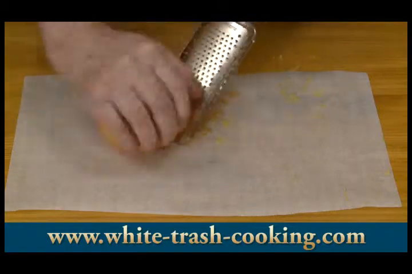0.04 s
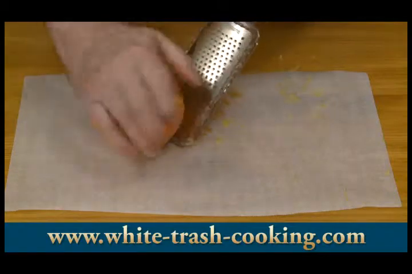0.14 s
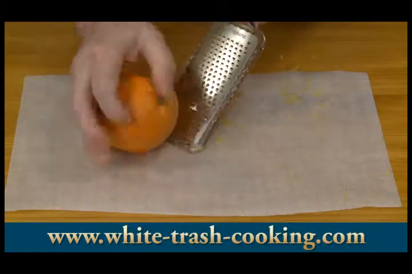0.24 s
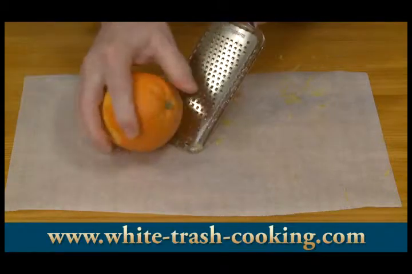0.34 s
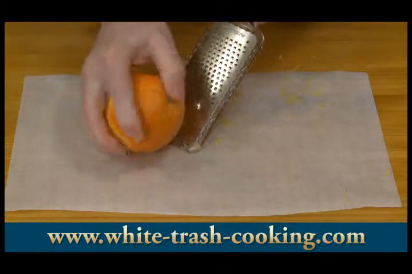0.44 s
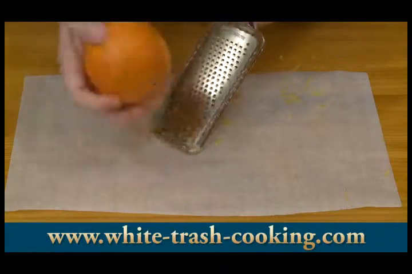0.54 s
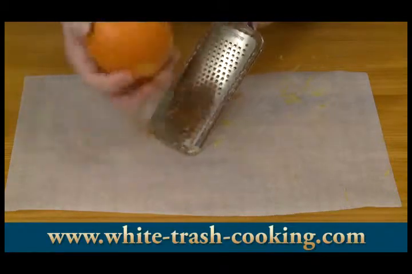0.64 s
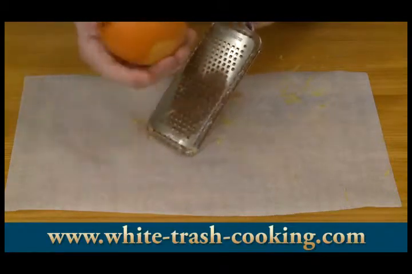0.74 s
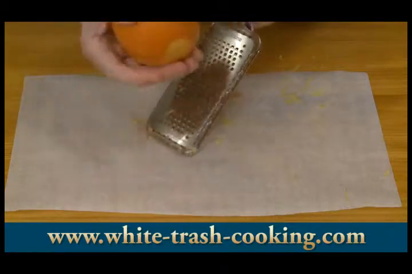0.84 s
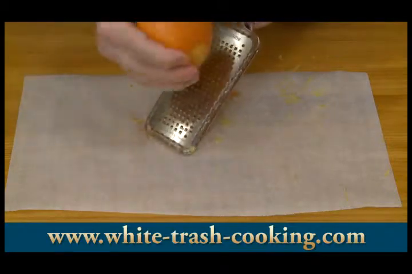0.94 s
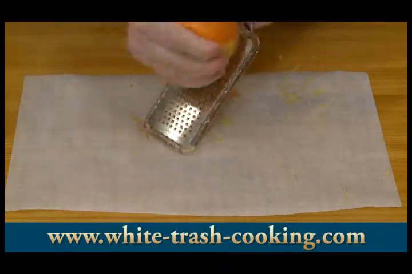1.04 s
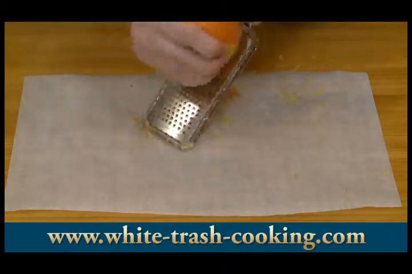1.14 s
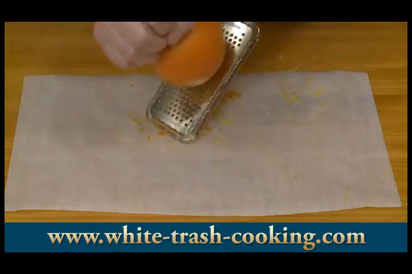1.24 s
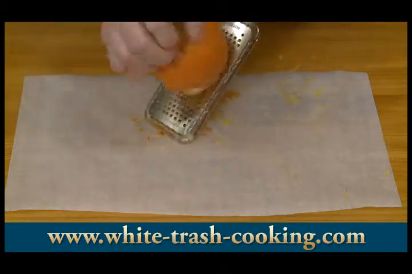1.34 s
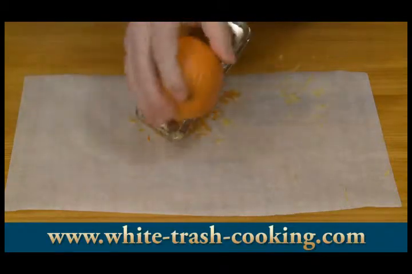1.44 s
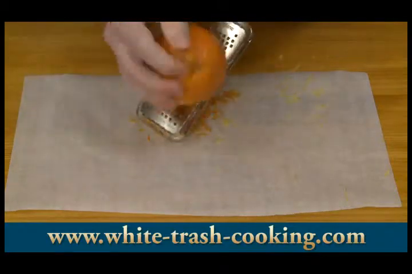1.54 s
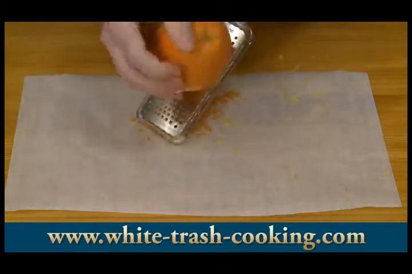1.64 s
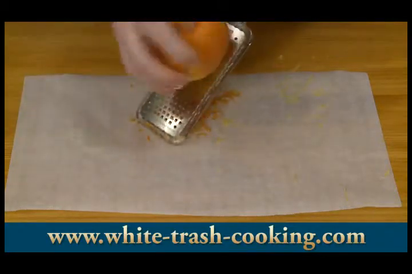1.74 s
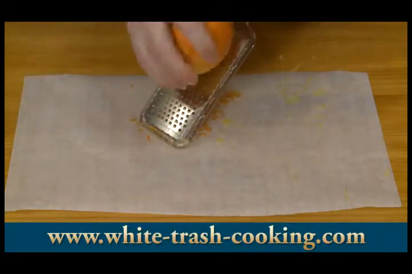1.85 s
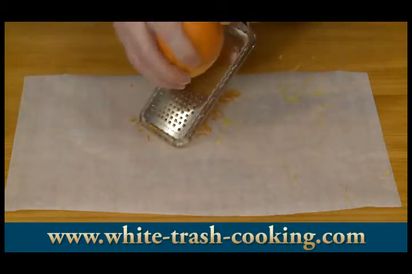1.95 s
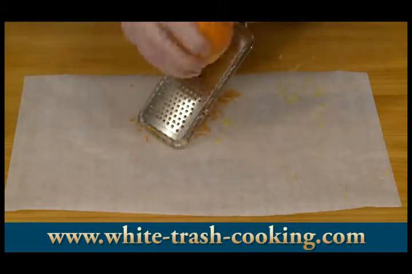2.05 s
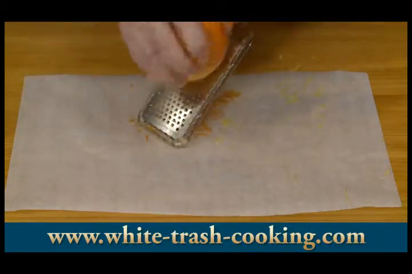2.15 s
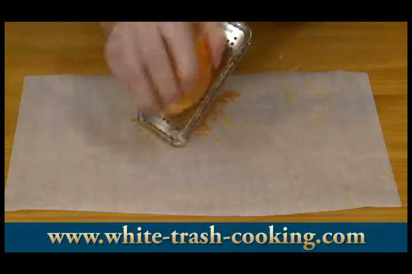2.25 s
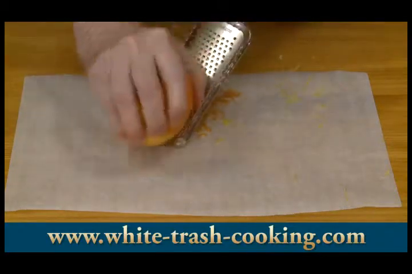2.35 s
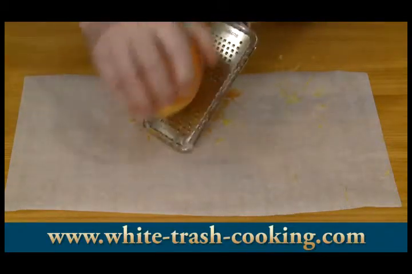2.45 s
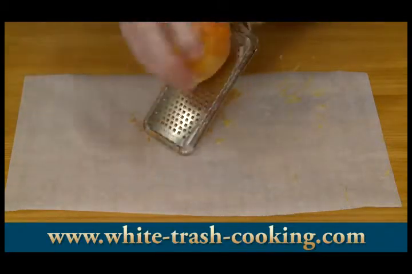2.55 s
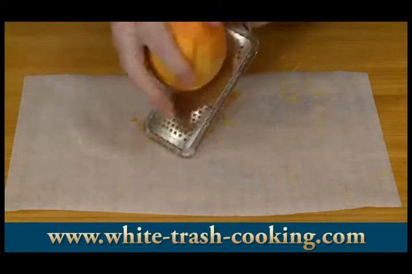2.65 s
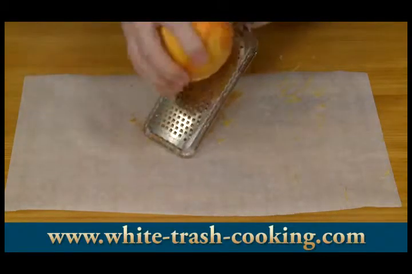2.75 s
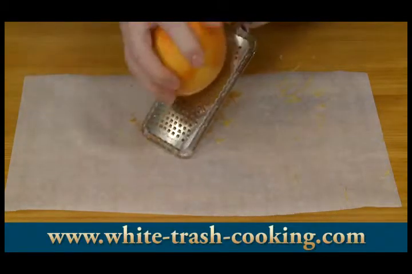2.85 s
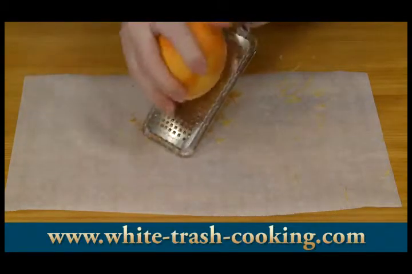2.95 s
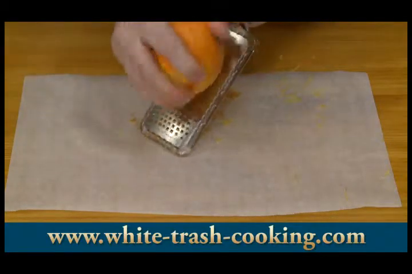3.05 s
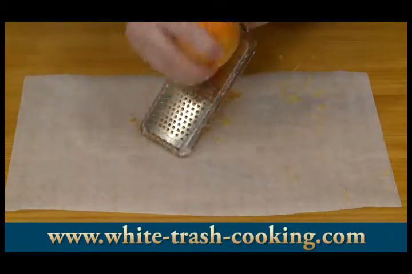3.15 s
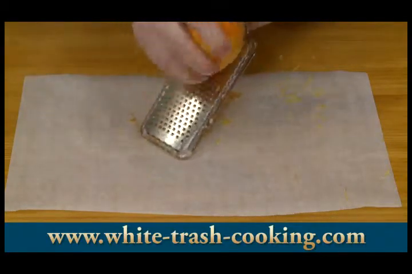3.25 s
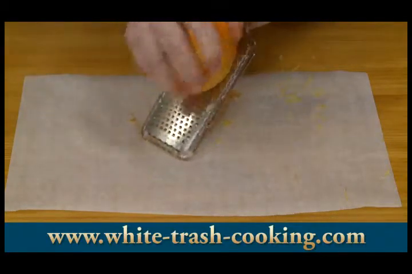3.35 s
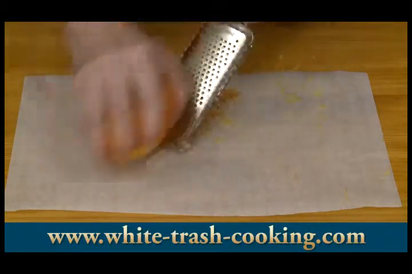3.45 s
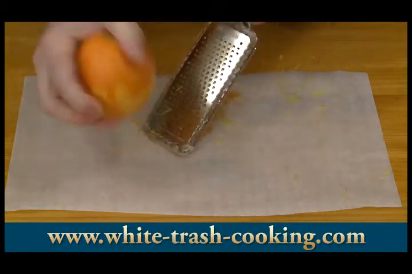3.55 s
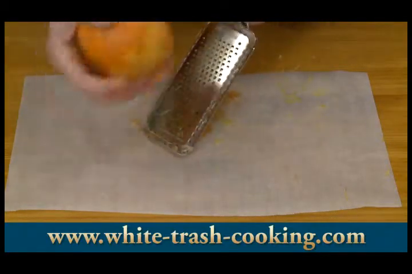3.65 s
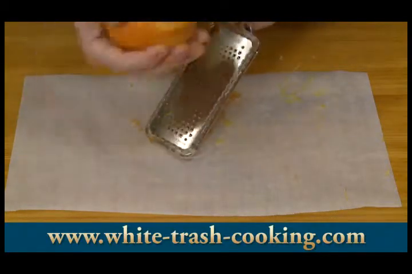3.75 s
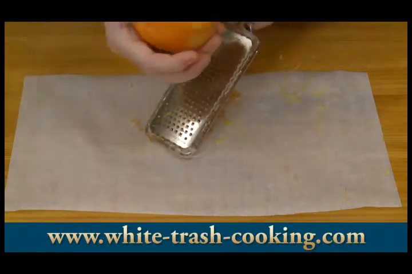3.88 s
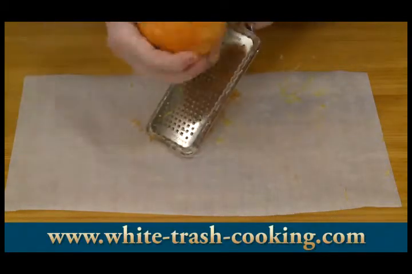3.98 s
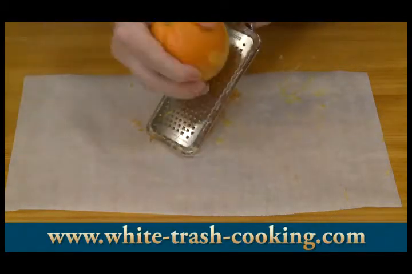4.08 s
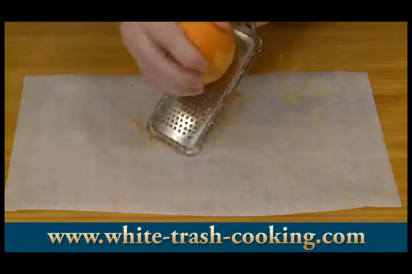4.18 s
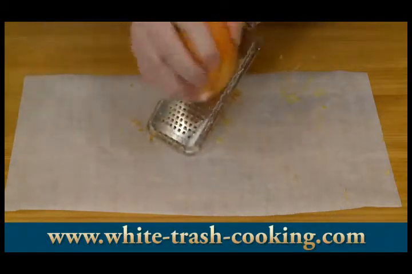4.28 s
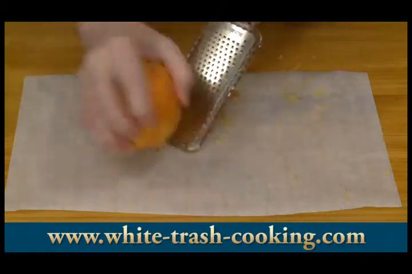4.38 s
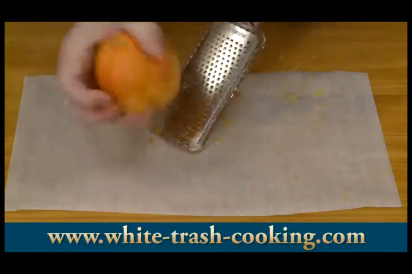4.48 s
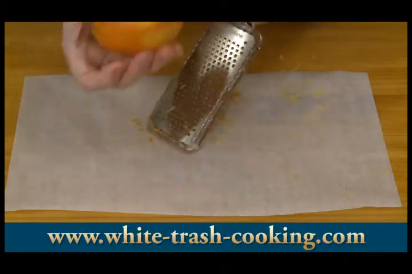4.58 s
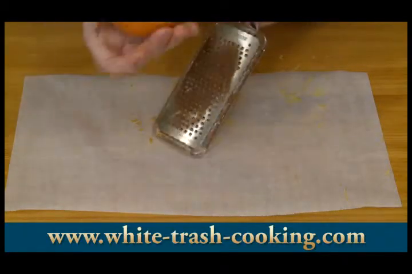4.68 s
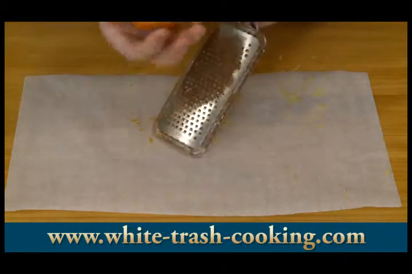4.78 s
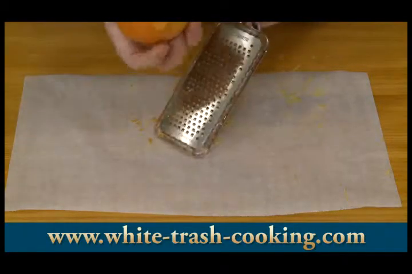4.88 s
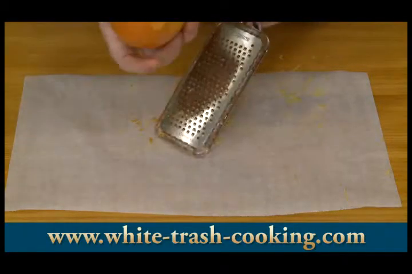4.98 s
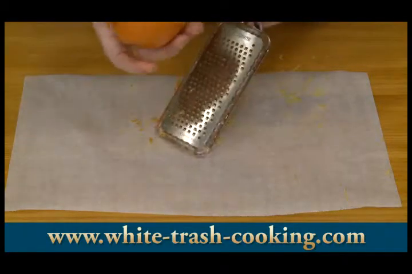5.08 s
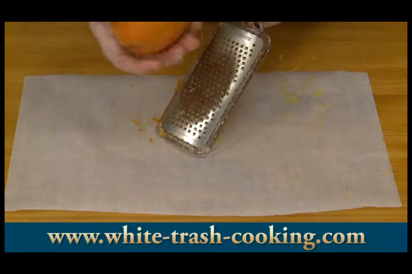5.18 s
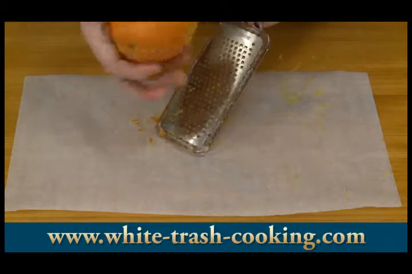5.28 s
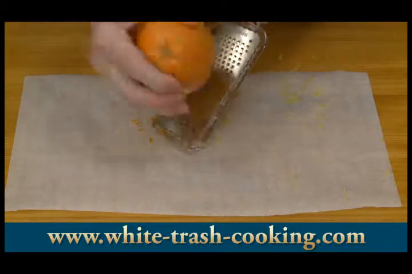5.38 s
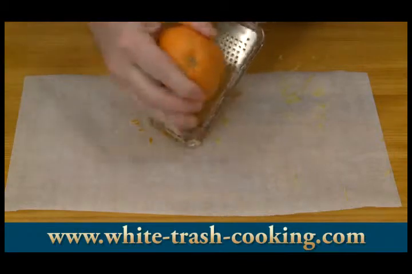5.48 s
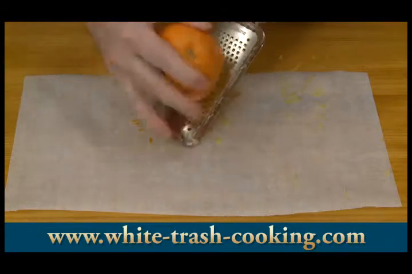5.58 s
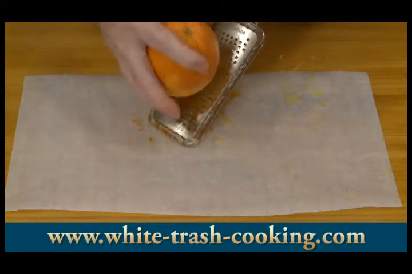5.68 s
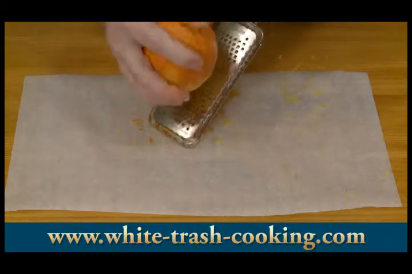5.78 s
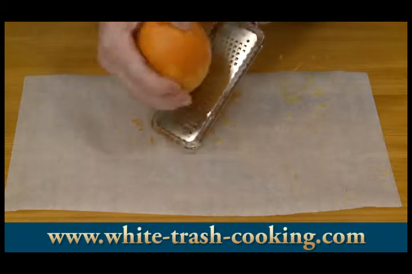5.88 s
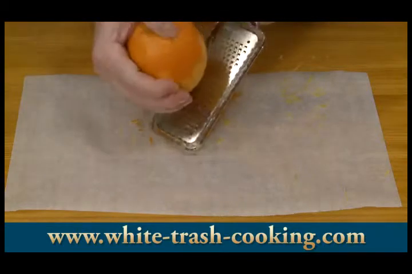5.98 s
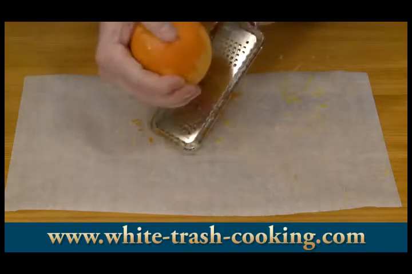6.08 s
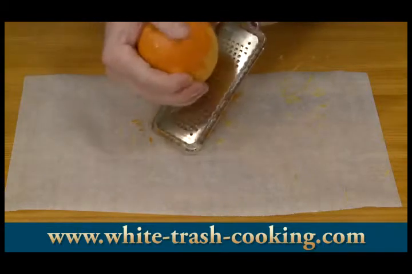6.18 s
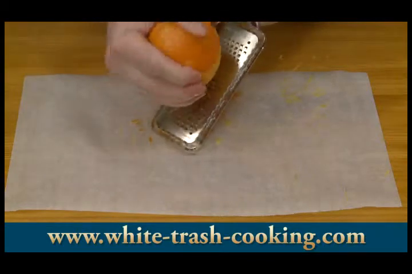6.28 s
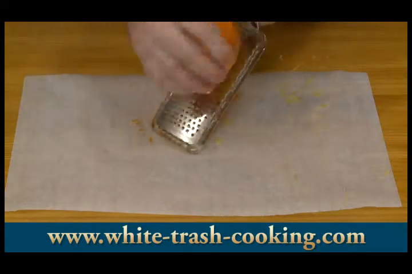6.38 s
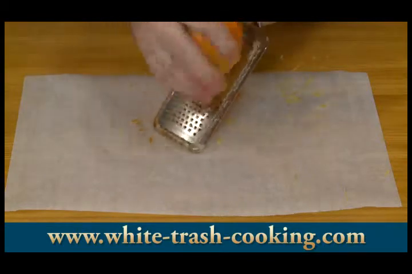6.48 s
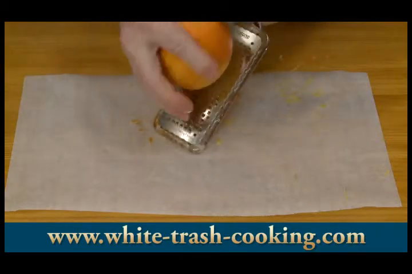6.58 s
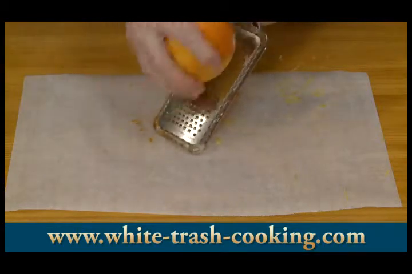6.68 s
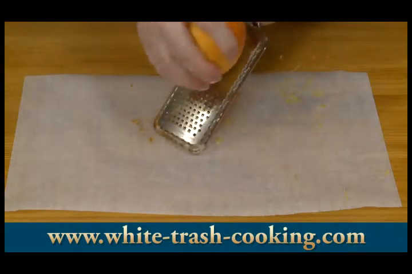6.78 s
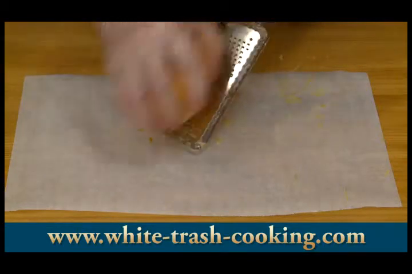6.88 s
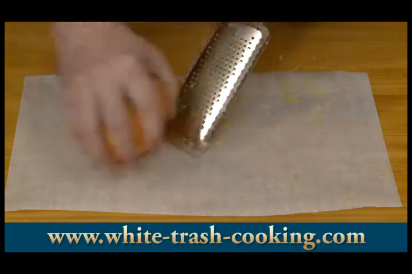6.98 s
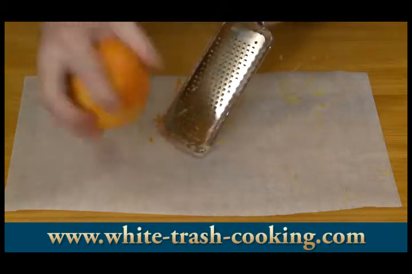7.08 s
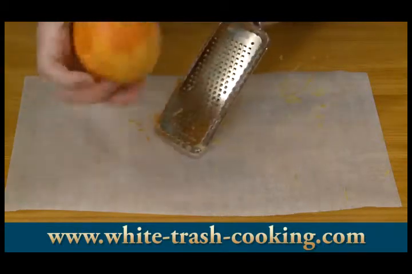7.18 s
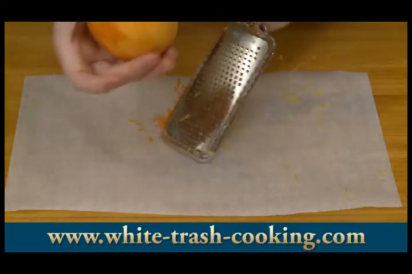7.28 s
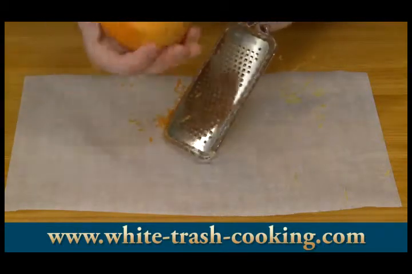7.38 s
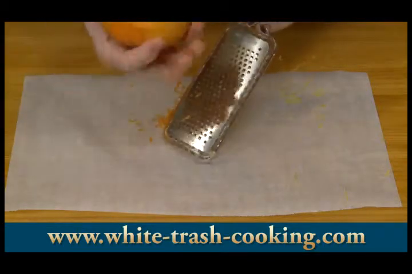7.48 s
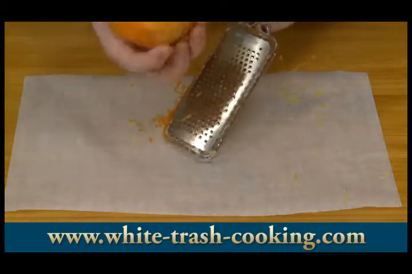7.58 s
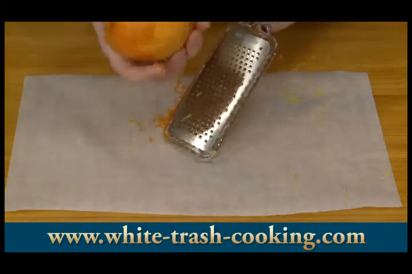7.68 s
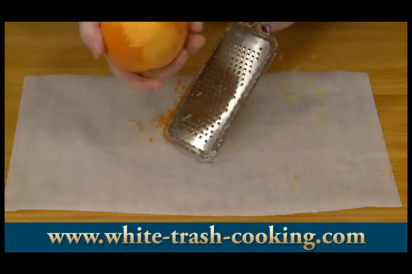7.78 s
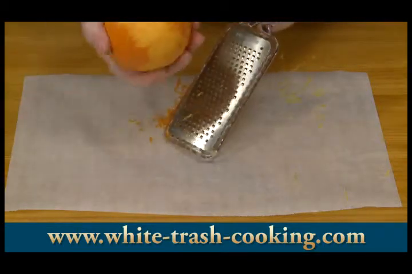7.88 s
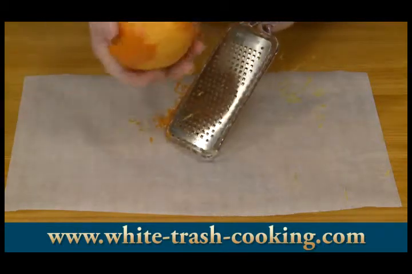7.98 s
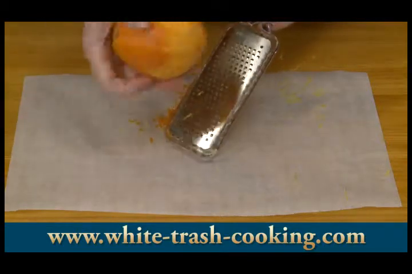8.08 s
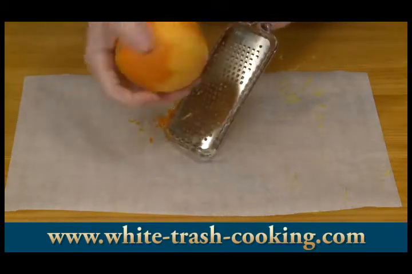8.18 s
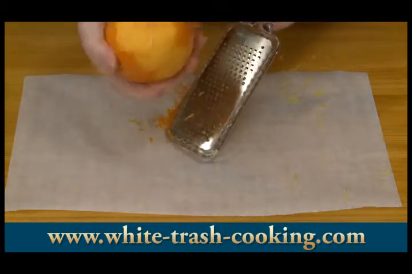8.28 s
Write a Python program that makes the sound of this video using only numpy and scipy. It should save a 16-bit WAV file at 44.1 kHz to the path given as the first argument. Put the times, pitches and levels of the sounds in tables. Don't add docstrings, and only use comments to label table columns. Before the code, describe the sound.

A quiet kitchen with a low fan rumble that wavers and a steady, thin electric buzz throughout. Close up, an orange is worked on a thin metal hand grater on a wooden table. A scrape is already ending at 0 seconds, with a soft deep thump at 0.1, then faint brushes and taps. At 1.15 a hard, dull double knock hits the plate, followed by a faint short scrape. The longest raspy pull comes at 2.2 to 2.4, with the grater's foot chattering. The strongest scrape is at 3.4, ending in a heavy low thump at 3.55. Knocks at 4.2 lead into a short swelling scrape at 4.3 to 4.4. It is mostly quiet until a loud, sharp double knock at 5.58; another single knock lands at 6.45. The last scrape at 6.9 ends in a thump and knocks around 7.05; light brushes fade, leaving only hum and buzz until 8.3.

```python
import sys
import numpy as np
from scipy import signal
from scipy.fft import irfft
from scipy.io import wavfile
from scipy.ndimage import uniform_filter1d

SR = 44100
rng = np.random.default_rng(int(sys.argv[2]) if len(sys.argv) > 2 else 0)


def boost(x):
    u = np.asarray(x, float) / 20
    return 10 ** u


def wrap_up_sound(samples):
    columns = np.atleast_2d(samples).T
    tamed = np.clip(columns, -1, 1)
    steps = np.round(tamed * 32767).astype(np.int16)
    wavfile.write(sys.argv[1], SR, steps)


N = 367353
T = np.arange(N) / SR

# (time [s], tone level [dB])
FAN_LOAD = [(0.0, -52), (1.48, -46.5), (1.76, -55.5), (3.57, -45.5), (4.06, -57), (4.64, -60), (4.87, -66),
            (5.87, -49), (6.75, -51.5), (7.03, -49.5), (7.75, -48.5), (8.33, -47)]
# (frequency [Hz], density [dB per Hz])
AIR = [(13, -33), (22, 1.5), (70, 2), (300, -9.5), (750, -14), (2290, -24), (3800, -27.5), (15700, -33)]
# (frequency [Hz], t60 [s])
ROOM = [(200, 0.76), (1000, 0.4), (4000, 0.31), (12000, 0.42)]
# (multiple of the buzz pitch [-], level [dB])
BUZZ_LINES = [(1, 0), (2, -8), (3, -13), (4, -10), (5, -20), (6, -13), (7, -18), (8, -17), (9, -17)]
# (frequency [Hz], rms level [dB])
WHINE = [(4974, -84), (9889, -84), (14863, -87)]
# (time [s], peak level [dB], pitch [Hz], overtone level [dB])
THUMPS = [(0.102, -29, 42.6, -12), (1.147, -42, 46.4, 5), (1.3, -41, 44.7, -22), (2.356, -35, 44.7, -21),
          (2.599, -39, 45.8, -0.6), (3.544, -21.5, 43.7, -5), (4.199, -41.5, 44, 1.1),
          (4.422, -38, 46.8, -5), (5.621, -34, 32, -8), (6.445, -39, 41, -1.5), (7.051, -21.5, 43.4, -0.5)]
# (time [s], blow peak [dB], blow pitch [Hz], relative body ring [dB], relative tick [dB])
KNOCKS = [(0.404, -41, 1750, -6, 0), (0.542, -57, 1450, -16, 8.5), (1.1324, -38, 3700, -9, -12),
          (1.671, -42, 1730, -8, -26), (1.875, -42, 1700, -25, -24), (2.125, -31, 935, 0.5, -17),
          (2.596, -31, 780, -3, -12.5), (2.729, -46, 2500, -18, -12), (2.912, -42.5, 1790, -17, -15),
          (2.98, -46, 2880, -18, -6), (3.023, -40, 1600, -20, -30), (3.233, -35, 1080, 0.5, -9.5),
          (3.541, -38, 2800, -4, -16), (3.596, -34, 810, 0, -28), (4.182, -34.5, 1670, -4.5, -14),
          (4.243, -36.5, 960, 1, -16), (5.555, -35, 2800, -8, -8), (6.919, -46.5, 1820, -12, 6),
          (7.051, -28, 1660, -13, -24), (7.096, -39, 1250, -19, -14), (7.164, -51, 1450, -16, 8),
          (7.201, -45, 1750, -22, -24)]
# (time [s], blow peak [dB], blow pitch [Hz], relative body ring [dB], relative tick [dB])
SLAMS = [
    (1.1429, -16, 1600, -11, -34),
    (1.1503, -21, 800, -8, -40),
    (5.5785, -16, 1750, -11, -3),
    (5.5843, -12, 1800, -10, -8),
    (6.4447, -15, 1750, -12, -18),
]
# (start [s], length [s], peak pressure [dB], swell to the peak [dB], peak place [0-1])
STROKES = [
    (-0.1, 0.17, -34, 10, 0.6),
    (1.208, 0.11, -47, 22.5, 1),
    (2.18, 0.23, -39, 7, 1),
    (3.368, 0.16, -33.5, 9.5, 0.85),
    (4.304, 0.12, -38.5, 19.5, 0.92),
    (6.905, 0.14, -36, 11.5, 0.95),
]
# (centre [s], length [s], plate ring [dB], relative fizz [dB])
BRUSHES = [(0.141, 0.015, -60.5, 15), (0.278, 0.12, -60.5, -3), (0.345, 0.042, -58.5, -1),
           (0.422, 0.067, -49, 7), (0.544, 0.03, -58, 1), (0.7, 0.038, -59, -6), (1.298, 0.016, -39, -27),
           (1.32, 0.025, -42, -26), (1.4, 0.04, -57, -16), (1.485, 0.19, -53, -6.5),
           (1.696, 0.093, -58, -8), (1.88, 0.059, -50, -14), (2.201, 0.18, -51, -8),
           (2.504, 0.055, -65.5, 5), (2.65, 0.064, -62, 0), (2.729, 0.066, -55, -7),
           (2.939, 0.072, -54, -8), (3.15, 0.11, -58.5, -7), (3.235, 0.041, -55.5, -2),
           (3.315, 0.18, -54.5, -4.5), (3.582, 0.016, -65, 20), (4.28, 0.1, -54.5, 0.5),
           (4.504, 0.15, -70, 15.5), (5.21, 0.012, -78, 3), (7.079, 0.02, -63, 13), (7.168, 0.03, -57, -6)]
# (centre [s], length [s], level [dB])
CHATTERS = [(0.096, 0.095, -37), (0.42, 0.047, -47), (2.269, 0.051, -36), (2.34, 0.18, -31),
            (2.418, 0.042, -48), (2.949, 0.048, -45), (3.382, 0.022, -32.5), (3.415, 0.036, -31),
            (3.643, 0.16, -55), (4.368, 0.12, -37.5), (4.513, 0.076, -47), (5.644, 0.14, -40),
            (6.92, 0.11, -48), (7.1, 0.07, -37), (7.144, 0.074, -47)]
# (frequency [Hz], level [dB], t60 [s])
PLATE = [(910, -7, 0.0097), (1066, 8, 0.012), (1244, 0, 0.051), (1503, -8, 0.07), (1721, 5.5, 0.03),
         (1826, 3.5, 0.013), (2130, -9.5, 0.11), (2340, 3.5, 0.013), (2870, -5.5, 0.055), (3030, -3, 0.023),
         (3372, -4.5, 0.05), (3610, -0.5, 0.022), (3940, 3.5, 0.0094)]
# (frequency [Hz], level [dB], t60 [s])
BODY = [(122, -2, 0.081), (246.1, -4, 0.22), (339, -7, 0.18), (370.3, -4.5, 0.15), (451, 4.5, 0.076),
        (602, 2.5, 0.076), (661, 0.5, 0.072), (713, 1, 0.1)]
# (frequency [Hz], level [dB], t60 [s])
TEETH = [(4890, -5.5, 0.006), (5590, -21, 0.049), (6030, -7, 0.0066), (7420, -4.5, 0.0062),
         (9090, -6, 0.0084), (10410, -12, 0.016), (11300, -4.5, 0.0048), (13300, -7.5, 0.0024),
         (14840, -14, 0.01)]

FAN_HZ, FAN_WIDTH_HZ, AIR_DB = 75.7, 17, -54
BUZZ_HZ, BUZZ_DB = 359.635, -58.5
EVEN_DB, EVEN_FALL_DB, ODD_DB, ODD_FALL_DB = -23.5, 1.9, -22, 5.6
THUMP_T60_S, OVERTONE_T60_S = 0.47, 0.22
KNOCK_RING_DB = -4.5
SLAM_RING_DB, RING_PER_TICK = 7, 0.62
BITE_S, SAG_DB = 0.013, 0.5
LIFT_DB_PER_S, CRUMBS_DB, CRUMBS_DB_PER_S = 474, -21, 90
FIZZ_START_DB, FIZZ_END_DB = -1.5, -1
LEAN_DB = -3.5
SPAN_START_HZ, SPAN_END_HZ, SPAN_REST_HZ = 2100, 1680, 1800
SPAN_DB, SPAN_WIDTH_HZ = -1.5, 520
UPPER_SPAN, UPPER_SPAN_DB = 1.75, -7
LIGHT_PLATE_DB = -7
EDGE_HZ = 15700


def evened(x):
    return x / np.sqrt(np.mean(x ** 2) + 1e-20)


def read(points, hz):
    f, value = np.transpose(points)
    return np.interp(np.log(hz + 1), np.log(f + 1), value)


def bump(centre, length):
    return np.cos(np.pi * np.clip((T - centre) / length, -.5, .5)) ** 2


def kitchen():
    hz = np.fft.rfftfreq(2048, 1 / SR)
    a, b, patches = rng.standard_normal((N // 512 + 5, 1025, 3)).T
    patches = uniform_filter1d(uniform_filter1d(patches, 20, 0), 6, 1)
    shape = boost(read(AIR, hz)[:, None])
    z = (a + 1j * b) * shape * boost(1.1 * evened(patches)) / np.linalg.norm(shape)
    wash = signal.istft(z, nperseg=2048, noverlap=1536)[1][:N] * 1.2

    r = np.exp(-np.pi * FAN_WIDTH_HZ / SR)
    noise = rng.standard_normal(N) + 1j * rng.standard_normal(N)
    waver = signal.lfilter([1 - r], [1, -r], noise)
    waver = 0.92 + waver / abs(waver).mean()
    fan = evened((waver * np.exp(2j * np.pi * FAN_HZ * T)).real)
    s, fan_db = np.transpose(FAN_LOAD)
    return boost(AIR_DB) * wash + boost(np.interp(T, s, fan_db)) * fan


def buzz():
    lines = [(k * BUZZ_HZ, BUZZ_DB + db) for k, db in BUZZ_LINES]
    for k in range(10, 44):
        top_db, fall_db = (ODD_DB, ODD_FALL_DB) if k % 2 else (EVEN_DB, EVEN_FALL_DB)
        lines.append((k * BUZZ_HZ, BUZZ_DB + top_db - fall_db * np.log2(k / 10)))
    lines += [(k * BUZZ_HZ / 3, -74 - 3.0 * np.log2(k / 2)) for k in range(2, 40) if k % 3]
    for hz, db in WHINE:
        lines += [(hz + k * BUZZ_HZ / 6, db - 6.4) for k in (4.0, 0.32, -16, 38, 10.0)]
    hz, db = np.transpose(lines)
    spectrum = np.zeros(2 ** 20 + 1, complex)
    bins = np.round(hz / SR * 2 ** 21).astype(int)
    spectrum[bins] = boost(db) * np.exp(2j * np.pi * rng.random(len(hz)))
    return np.sqrt(2) * 2 ** 20 * irfft(spectrum)[:N]


def room(x):
    taps = np.zeros(SR // 2)
    at = np.arange(200, len(taps) - 20, 20)
    taps[at + rng.integers(0, 20, len(at))] = rng.choice([-1., 1.], len(at))
    hz, t, z = signal.stft(taps, SR, nperseg=256)
    decay = boost(-60 * t / read(ROOM, hz)[:, None])
    tail = signal.istft(z * decay, SR, nperseg=256)[1]
    return signal.oaconvolve(x, tail / np.linalg.norm(tail))[:N]


def thumps():
    out, t = np.zeros(N + SR), T[:SR]
    sag = 0.34 * 0.03 * (1 - np.exp(-t / 0.012))
    onset = 1 - np.exp(-t / 0.0016)
    for s, db, hz, over_db in THUMPS:
        turn = 2 * np.pi * hz * (t + sag)
        swing = boost(-60 * t / THUMP_T60_S) * np.sin(turn)
        swing += boost(over_db - 60 * t / OVERTONE_T60_S) * np.sin(2.27 * turn)
        out[round(s * SR):][:SR] += boost(db) * onset * swing
    return out[:N]


def ring(modes, damping=1, detune=1):
    t = T[:6000]
    hz, db, t60 = np.transpose(modes)[:, :, None]
    sign = (-1) ** np.arange(len(modes))[:, None]
    decay = boost(db - 60 * damping * t / t60)
    return (sign * decay * np.sin(2 * np.pi * hz * detune * t)).sum(0)


def struck(blow_hz, tick_db):
    plate = []
    for hz, level, t60 in PLATE:
        octaves = np.log2(hz / blow_hz)
        missed_db = 54.0 * max(octaves - .9, 0) * (tick_db < -20)
        plate.append((hz, level - 6.6 * abs(octaves) - missed_db, t60))
    body = [(hz, level - 2.5 * np.log2(blow_hz / hz) * np.log2(blow_hz / 700), t60)
            for hz, level, t60 in BODY[1:]]
    teeth = [(hz, level - 8.6 * np.log2(hz / 5000), t60) for hz, level, t60 in TEETH]
    return plate, body, teeth


def knocks():
    out, t = np.zeros(N + 20000), T[:9000]
    blows = [(SLAM_RING_DB + RING_PER_TICK * slam[-1], slam) for slam in SLAMS]
    blows += [(KNOCK_RING_DB, knock) for knock in KNOCKS]
    for plate_db, (s, db, blow_hz, body_db, tick_db) in blows:
        u = t * blow_hz / .6
        blow = u * np.exp(1 - u) * -np.sin(2 * np.pi * blow_hz * t)
        sound = np.pad(blow, (0, 5999))
        plate, body, teeth = struck(blow_hz, tick_db)
        # modes, relative dB, damping, rattle dB, rattle t60 s
        parts = ((plate, plate_db, 1.6, -27, .16),
                 (body, body_db, 1.5, -32, .16),
                 (teeth, tick_db, 2.5, -22, .17))
        for modes, rel_db, damping, rattle_db, rattle_s in parts:
            rattle = rng.standard_normal(len(t)) * boost(rattle_db - 60 * t / rattle_s)
            part = signal.oaconvolve(rattle + (t == 0), ring(modes, damping))
            sound = sound + boost(rel_db) * part / abs(part).max()
        out[round(s * SR):][:len(sound)] += boost(db) * sound
    return out[:N]


def grit(per_s, spread_db):
    size = boost(spread_db * np.minimum(rng.exponential(1, N), 5))
    return size * rng.choice([-1., 1.], N) * (rng.random(N) < per_s / SR)


def scraped(modes, per_s, spread_db, damping, judder_db):
    x = np.zeros(N)
    for detune in (.97, 1, 1.03):
        x += signal.oaconvolve(grit(per_s, spread_db), ring(modes, damping, detune))[:N]
    judder = evened(uniform_filter1d(uniform_filter1d(rng.standard_normal(N), 300), 300))
    return evened(x * boost(judder_db * judder))


def free_span(span_hz):
    r = np.exp(-np.pi * SPAN_WIDTH_HZ / SR)
    catches = grit(700, spread_db=3.0)
    span = np.zeros(N)
    for ratio, db in ((1, 0), (UPPER_SPAN, UPPER_SPAN_DB)):
        turn = np.exp(2j * np.pi * ratio * np.cumsum(span_hz) / SR)
        span += boost(db) * (turn * signal.lfilter([1 - r], [1, -2 * r, r * r], catches / turn)).real
    return evened(span)


def strokes():
    plate_gain, body_gain, fizz_gain, span_gain = np.zeros((4, N))
    span_hz = np.full(N, 1. * SPAN_REST_HZ)
    for start, length, db, swell_db, top in STROKES:
        u = np.clip((T - start) / length, 0, 1)
        after = np.maximum(T - start - length, 0)
        top = np.clip(top, .05, .95)
        bend_db = np.where(u < top, swell_db * (1 - u / top) ** 2, SAG_DB * ((u - top) / (1 - top)) ** 2)
        lift = boost(-LIFT_DB_PER_S * after) + boost(CRUMBS_DB - CRUMBS_DB_PER_S * after)
        bite = np.clip((T - start) / BITE_S, 0, 1) ** 2
        pressure = bite * boost(db - bend_db) * lift
        plate_gain += pressure
        body_gain += pressure * boost(LEAN_DB)
        fizz_gain += pressure * boost(FIZZ_START_DB + (FIZZ_END_DB - FIZZ_START_DB) * u)
        span_gain += pressure
        glide_hz = SPAN_START_HZ + (SPAN_END_HZ - SPAN_START_HZ) * u
        span_hz = np.where((u > 0) & (after < .1), glide_hz, span_hz)
    for centre, length, db, fizz_db in BRUSHES:
        touch = bump(centre, length)
        plate_gain += touch * boost(db + LIGHT_PLATE_DB)
        fizz_gain += touch * boost(db + fizz_db)
        span_gain += touch * boost(db)
    for centre, length, db in CHATTERS:
        body_gain += bump(centre, length) * boost(db)
    plate = scraped(PLATE, per_s=500, spread_db=0.5, damping=4.0, judder_db=0.5)
    body = scraped(BODY, per_s=200, spread_db=3.4, damping=2.3, judder_db=2.5)
    fizz = scraped(TEETH, per_s=2500, spread_db=2.4, damping=1.6, judder_db=1.5)
    span = boost(SPAN_DB) * free_span(span_hz)
    return plate_gain * plate + span_gain * span + body_gain * body + fizz_gain * fizz


def scene():
    grater = strokes() + knocks()
    return (grater + boost(-10.5) * room(grater) + thumps() + kitchen() + buzz())[None]


def roll_off(x):
    return signal.sosfilt(signal.butter(12, 16490, fs=SR, output="sos"), x)


def record(dry):
    edge = signal.firwin(511, EDGE_HZ, window=("kaiser", 9), fs=SR)
    mix = signal.oaconvolve(dry, edge[None], "same")
    return roll_off(mix)


dry = scene()
out = record(dry)
wrap_up_sound(out)
```